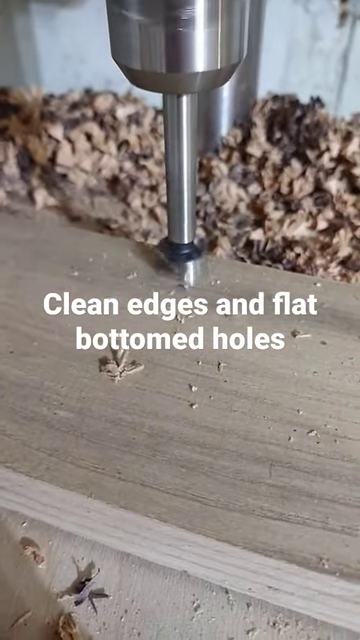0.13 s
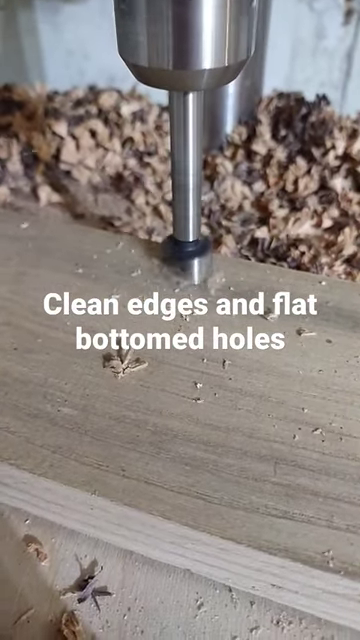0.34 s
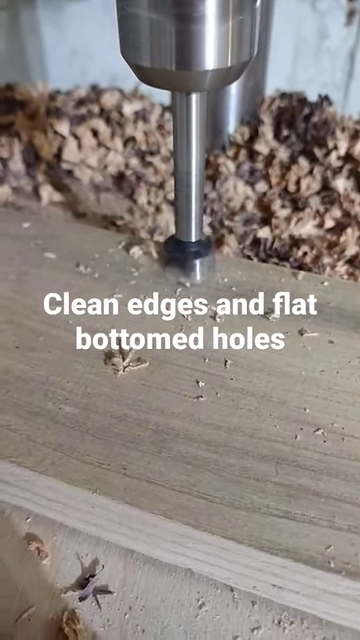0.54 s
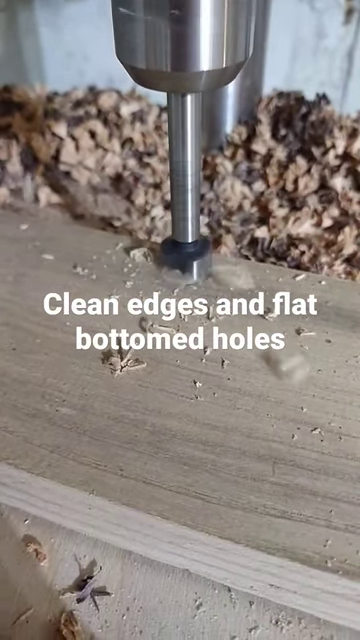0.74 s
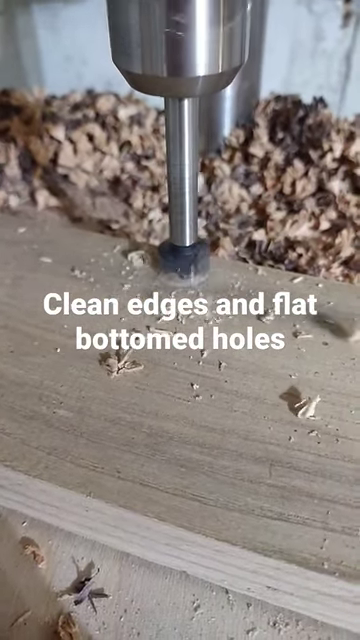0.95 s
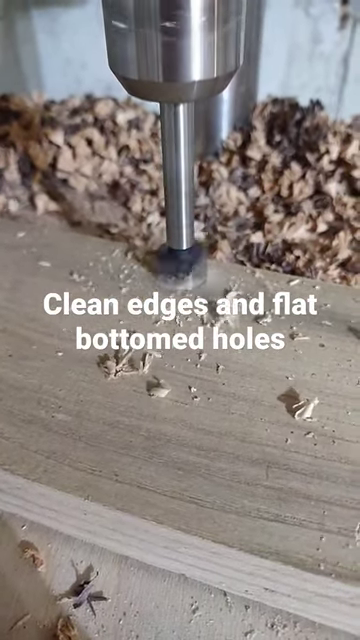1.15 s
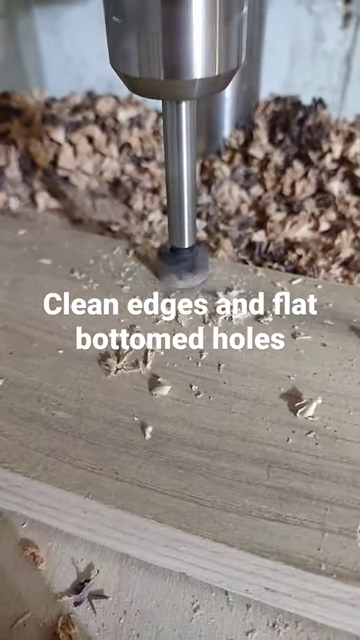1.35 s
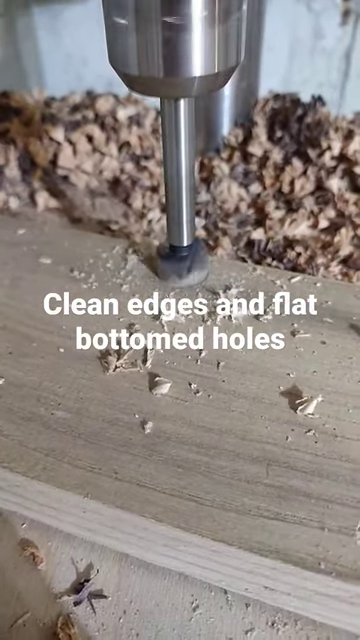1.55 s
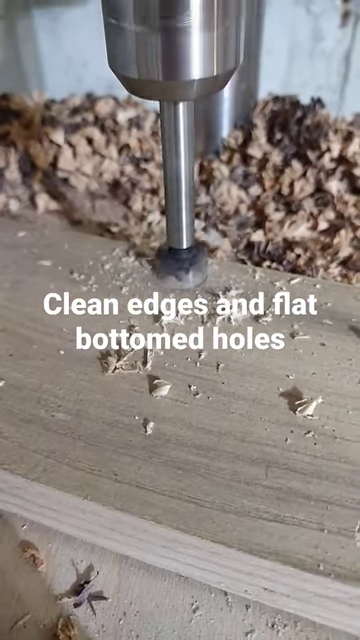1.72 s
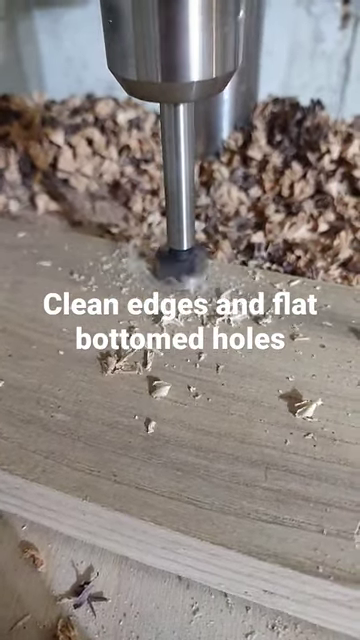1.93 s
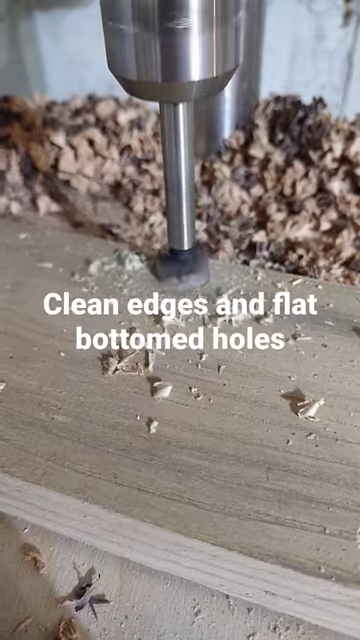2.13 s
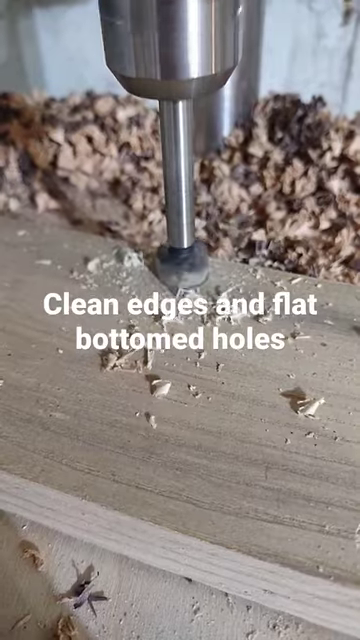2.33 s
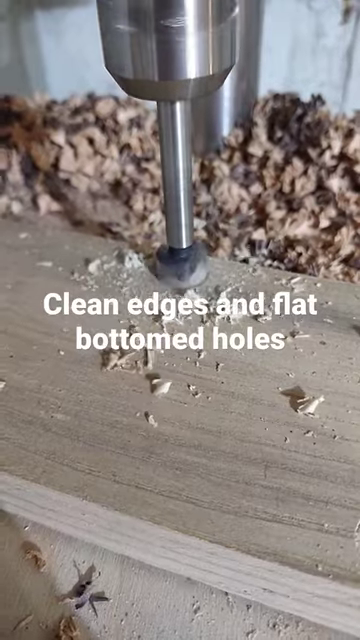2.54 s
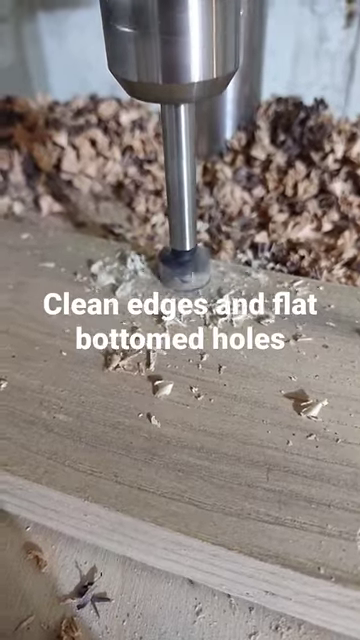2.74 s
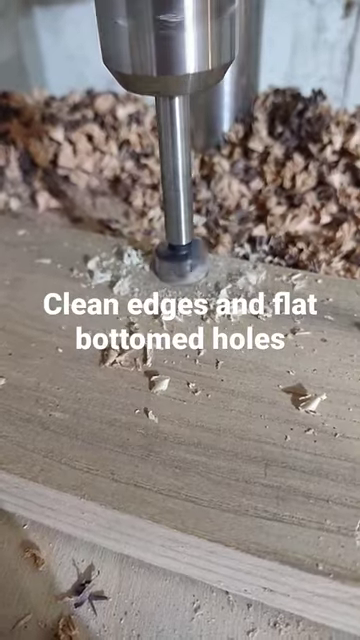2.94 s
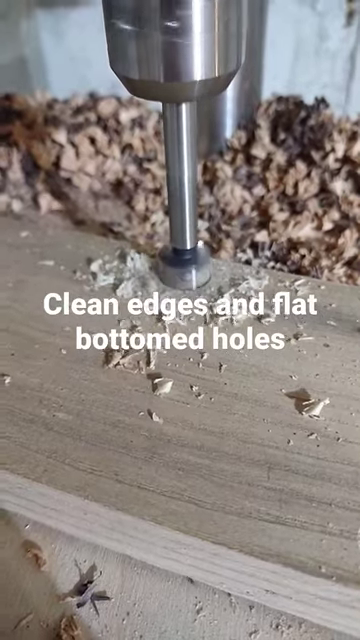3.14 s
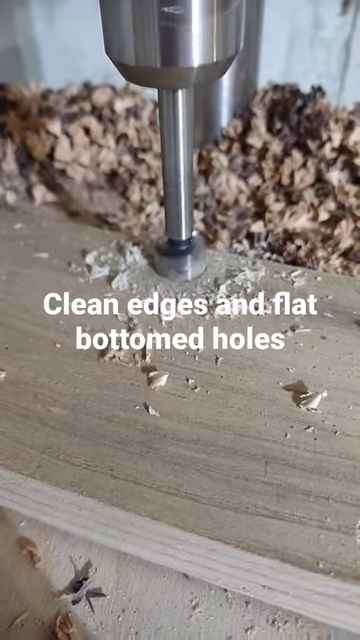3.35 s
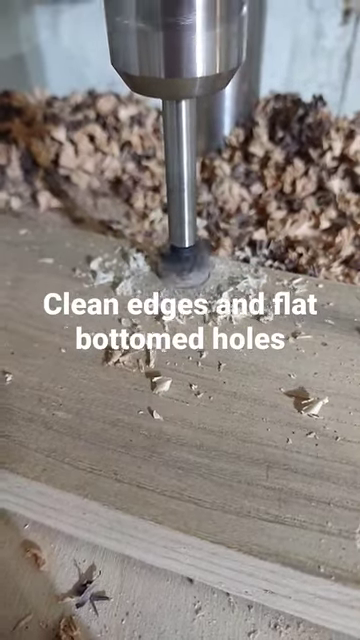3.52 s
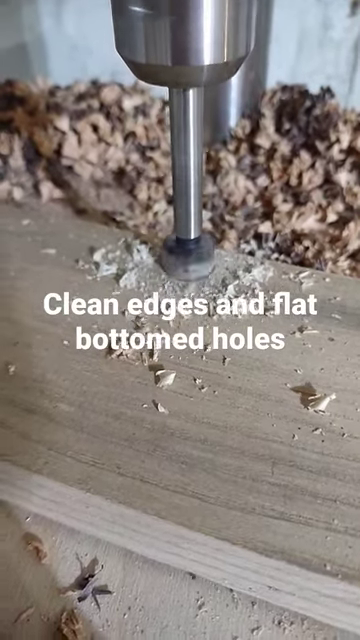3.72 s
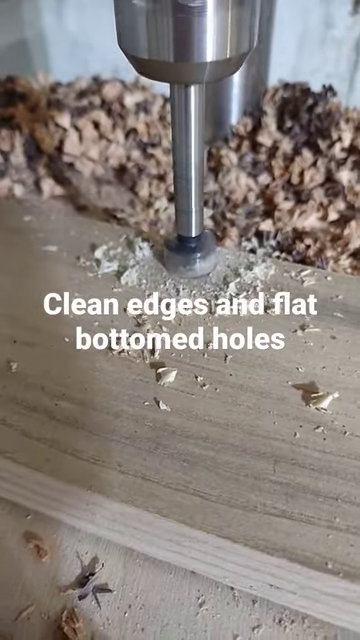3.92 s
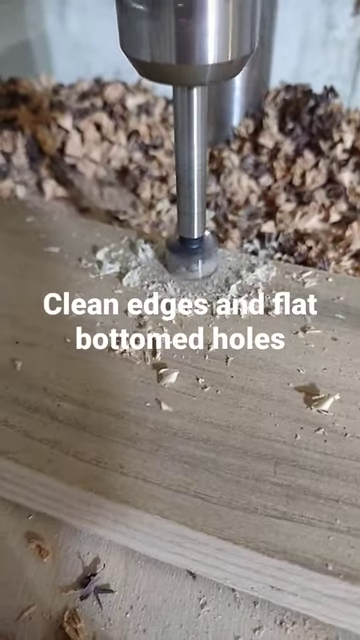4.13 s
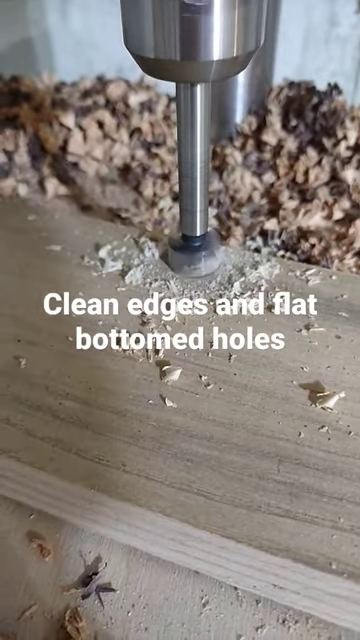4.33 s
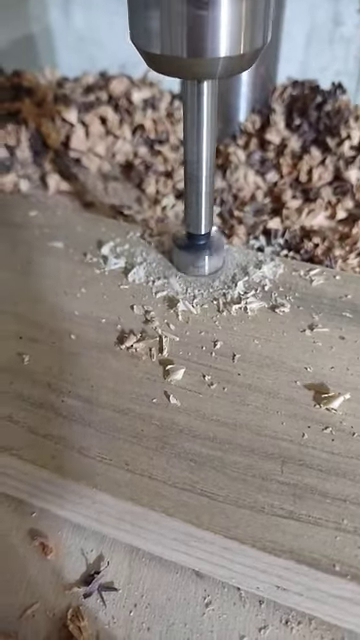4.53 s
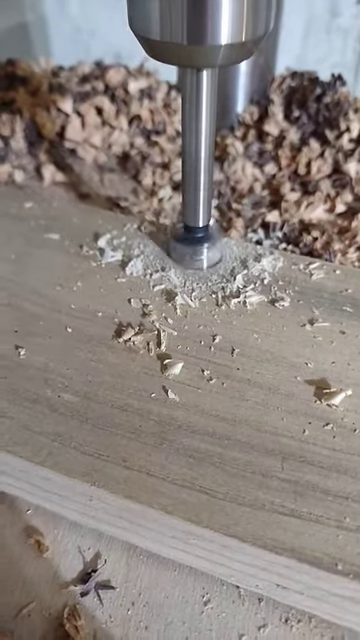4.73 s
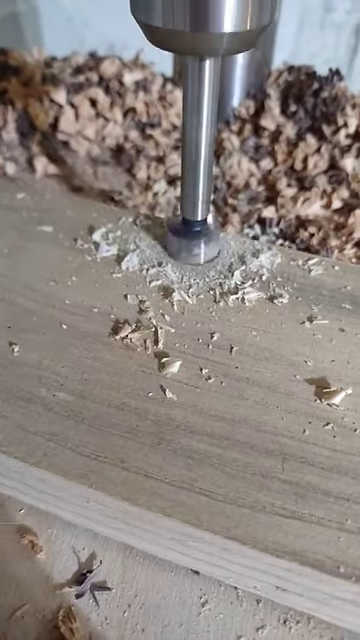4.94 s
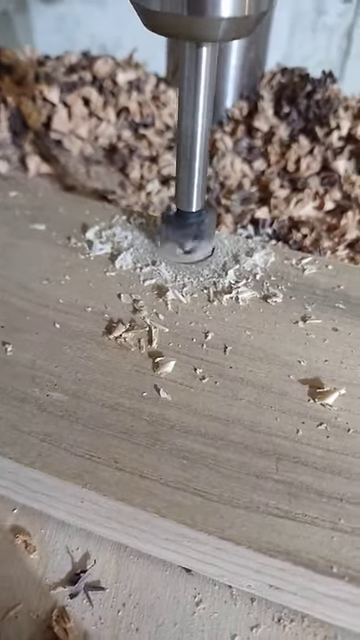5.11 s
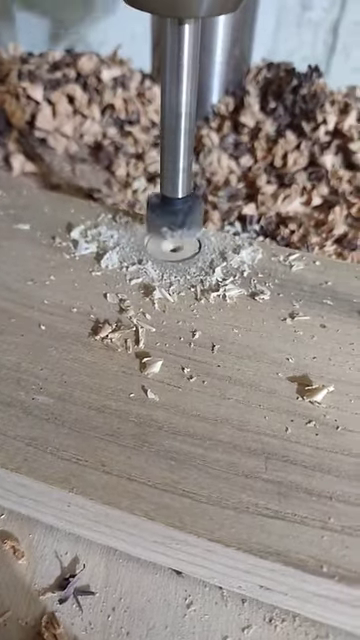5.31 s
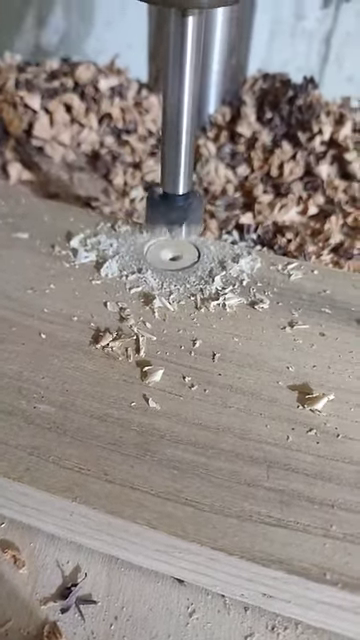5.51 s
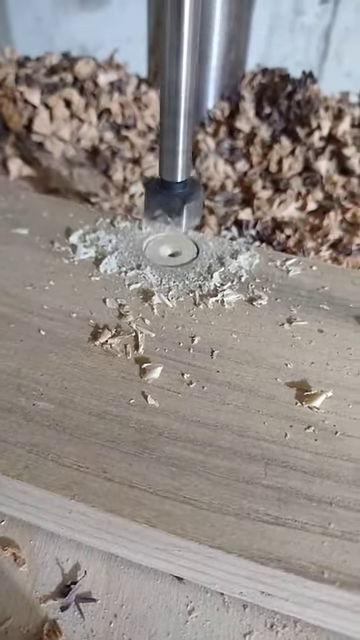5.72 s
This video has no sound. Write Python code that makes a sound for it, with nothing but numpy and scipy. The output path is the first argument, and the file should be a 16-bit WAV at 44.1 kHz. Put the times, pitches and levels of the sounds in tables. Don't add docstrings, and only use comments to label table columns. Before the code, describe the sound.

A drill press cuts a flat-bottomed hole in a board, heard very close in a small, fairly dry workshop. At 0 s the bit is already rubbing the wood; by about 0.4-0.6 s it bites hard into a harsh, loud growl, fluttering roughly 25 times per second. Low table shudder, a woody roar around 400 Hz, a ringing metallic whine near 2 kHz and crackly chip hiss pulse together. At first the grain is ragged; from about 2 s the turns sound increasingly alike, with uneven alternate beats around 2.7 s. The load eases from 4.8 s, the whine sliding slightly downward, and cutting stops by 5.1 s. A quiet, steady motor hum and airy whirr remain. Light ticks come at 5.1-5.2 s, with low, rubbing groans, then a bright tick at 5.54 s, a knock at 5.57 s and the heaviest dull thud at 5.64 s, rebounding quickly.

```python
import sys
import numpy as np
from scipy import signal
from scipy.fft import rfft, irfft, next_fast_len
from scipy.io import wavfile
from scipy.ndimage import uniform_filter1d

SR = 44100
rng = np.random.default_rng(int(sys.argv[2]) if len(sys.argv) > 2 else 0)


def wav_record(signal):
    frames = np.transpose(np.atleast_2d(signal))
    bounded = np.clip(frames, -1, 1)
    quanta = np.round(bounded * 32767).astype(np.int16)
    wavfile.write(sys.argv[1], SR, quanta)


def linear_from_db(decibels):
    return 10 ** (np.asarray(decibels, float) / 20)


N = 254445
TIME = np.arange(N) / SR

# time_s, speed_turns_per_s
SPINDLE = [(0, 12.211), (0.3, 12.187), (0.6, 12.18), (1, 12.189), (1.5, 12.215), (2, 12.246), (2.5, 12.271),
           (3, 12.287), (3.5, 12.294), (4, 12.298), (4.5, 12.31), (5, 12.335), (5.8, 12.335)]
# time_s, level_db
FEED = [(0, -24.5), (.1, -23.5), (.22, -20), (.4, -17.5), (.6, -16.5), (.9, -16), (1.3, -17.5),
        (1.9, -17.5), (2.6, -17.5), (3.2, -17.5), (3.7, -17), (4.3, -17), (4.8, -18), (4.92, -19.5),
        (5.02, -25.5), (5.1, -24.5)]
# full_feed_db, feed_follow_ratio, per_depth_db, mid_hole_db, lift_db
PARTS = dict(table=(-17.5, 1.24, -6.5, 1.5, -3), board=(-21.5, 1.5, 0, 0.36, 3),
         shank=(-19.5, 1.13, 1.5, -2, -6), rim=(-27.5, 1.46, 2.5, 0, 7), chips=(-21.5, 1.5, -3, -4, -6),
         fizz=(-35.5, 1.9, -4, -1.5, -13))
# pitch_hz, width_hz, level_db, polarity
BOARD_MODES = [(220, 16, -19, 0.55), (360.3, 78, -3, -0.52), (397.7, 53.8, -0.5, 1),
               (419.7, 43.5, 2, -0.69), (500, 81, -5, 0.18)]
WALL_MODES = [(586, 35, -1.5, 0.45), (770, 99, -16.5, -0.93), (859, 83, -21.5, 0.69)]
FACE_MODES = [(1078, 66.5, -7, -0.83), (1193, 127, -10, 0.63), (1445, 91, -13.5, -0.85),
              (1597, 80, -18.5, 1)]
SHANK_MODES = [(2162, 85, 0, 1), (2390, 330, -13, -1)]
RIM_MODES = [(1962, 69, -1.7, 1), (3102, 110, -11.5, -0.74), (3880, 270, -18, 0.88)]
CHIP_MODES = [(3100, 124, 1.4, 0.65), (3232, 160, 0.5, -1.06), (3570, 137, -0.5, 1),
              (4029, 132, 0.9, -0.82), (4436, 120, -10.5, 1), (4747, 134, -6, -0.94), (5510, 220, -5, 0.68),
              (5822, 290, -10.5, -1.22), (6150, 720, -20.5, 0.75)]
FIZZ_MODES = [(7000, 90, -3, 1), (7680, 220, 4, 0.9), (8400, 580, -5, -0.81), (8930, 250, 3.5, -1.03),
              (9930, 330, -1, 0.38), (10070, 320, 1.3, 0.8), (10900, 190, 2, -1.1), (11300, 430, -1.5, -1),
              (12200, 400, -16, 1), (12540, 260, 5.5, 1), (12500, 830, -2.5, -1.4),
              (14100, 640, -1.5, -0.89), (15200, 520, -1.5, 1)]
# pitch_hz, width_hz, removed_share
DIPS = [(926, 180, 0.32), (1802, 140, 0.77), (2750, 450, 0), (5100, 270, 0.11), (6550, 250, 0.2),
        (7150, 83, 0), (9600, 250, 0.45), (13900, 400, 0.2)]
# spindle_order, shallow_db, deep_db
SHAKE = [(5, -55, -54), (6, -35, -43), (7, -41, -47), (8, -36, -31), (9, -39, -31), (10, -32, -36),
         (11, -32, -41), (12, -26, -30), (13, -31, -40), (14, -20, -29.5), (15, -38, -48), (16, -33, -38),
         (17, -41, -45), (18, -52, -50)]
OPPOSED_ORDERS = (5, 6, 7, 8, 10, 15, 16, 17, 18)
MIDWAY_DB = {7: 5, 9: 7}
# start_s, level_db, brightness_0_1, rattle_s
KNOCKS = [
    (5.102, -39, 0.9, 0.004),
    (5.172, -26, .3, .004),
    (5.54, -20.5, 1, 0.01),
    (5.387, -52, 0.9, .02),
    (5.571, -40, .99, .002),
    (5.575, -16.5, 0.44, 0.0037),
    (5.643, -10.5, 0.03, 0.0054),
    (5.648, -15.5, 0, 0.013),
    (5.663, -20, 0.3, 0.01),
    (5.675, -24, 0, 0.014),
]
# pitch_hz, width_hz, level_db, polarity
HEAD_MODES = [(379, 34, 8, 0.92), (453, 114, 4, -0.82), (622, 41, 0.5, 1), (790, 290, -19, 0.13),
              (1146, 92, -4, -1.17), (1410, 270, -7, 0.98), (1860, 120, -12, -1.23), (2450, 210, -18, 0.76),
              (3250, 730, -30.5, -1.44), (2780, 400, -29, 0.58), (4860, 680, -30, 0.45)]
NUT_MODES = [(1210, 380, 1, 0.97), (1960, 220, 6.5, -1), (2570, 400, -0.5, 1), (4540, 3300, -11.5, -0.81),
             (9000, 2800, -14, 1), (14000, 3000, -17, -0.87)]
# centre_s, level_db, pitch_hz,
# length_s
GROANS = [(5.165, -27, 350, 0.047), (5.36, -29, 156, 0.094), (5.463, -38, 190, 0.22),
          (5.68, -28, 183, 0.091), (5.765, -29, 450, 0.084), (4.5, -36, 305, 0.15), (5.43, -67, 14200, .2),
          (5.522, -56, 14000, .008), (5.577, -50, 15200, .008), (5.2, -66.5, 4560, .9),
          (5.6, -64, 4100, .8), (1.17, -22, 432, 0.76)]
# pitch_hz, density_db_per_hz
IDLE = [(70, -10.5), (170, 2), (280, -8), (400, 1), (600, -9.5), (2600, -23), (4000, -43.5), (15500, -54)]
# pitch_hz, level_db
HUM = [(120, -33.5), (240, -35.5), (393, -40.5), (630, -42.5), (981, -49), (1012, -49.5), (1145, -48),
       (1389, -54), (1685, -54), (1970, -51), (2080, -65), (2440, -55)]

SHALLOW, DEEP = 0.2, 0.78
FULL_FEED_DB = -17
BOTTOM_S, LIFT_S = 4.82, 0.24
POINT_S = 0.3
SHARP, SCORE_SHARP, SCORE_S, SCORE_WIDTH_S = 0.62, 1.05, 0.52, 0.5
LEAD, KNOT_LEAD, KNOT_S, KNOT_WIDTH_S = 0.12, 0.52, 2.7, 0.91
REPEAT, GUIDED_REPEAT, GUIDE_S, GUIDE_RISE_S = 0.08, 0.85, 0.51, 1.66
SLACK_HZ = 176.6


def cut():
    angle = turns()
    sharp, lead, repeat = manner()
    slack_hz = SLACK_HZ * lift()

    grain = fibres(angle, repeat, 4.4, 0.0025)
    board = ring(grain * bite(angle, 0.12 * sharp, 0.14 * lead, 0.016), BOARD_MODES)
    board += ring(grain * linear_from_db(5.1 * (repeat - 0.56)), WALL_MODES)
    board += ring(grain * bite(angle, 0.68 * sharp, 0.3 * lead, 0.538), FACE_MODES)

    shank = fibres(angle, 1.02 * repeat, 1.17, 0.0025) * bite(angle, 0.37 * sharp, 0.42 * lead, 0.572)
    shank = ring(shank, SHANK_MODES)
    shank = ring(shank, [(1940, 1200, 0, 1)])

    rim = fibres(angle, 0.79 * repeat, 3.2, 0.002) * bite(angle, 0.72 * sharp, 0.5 * lead, 0.5)
    rim = ring(rim, RIM_MODES)

    chips = fibres(angle, 0.5 * repeat, 3.5, 0.0015) * bite(angle, 0.5 * sharp, 0.15 * lead, 0.045, skew=0.55)
    chips = ring(chips, CHIP_MODES)

    fizz = sum(tearing(angle, sharp, lead, repeat, modes) for modes in (FIZZ_MODES[:7], FIZZ_MODES[7:]))

    catch = fibres(angle, repeat, 6.0, 0.0019) * bite(angle, 0.5 * sharp, 9 * lead + 3.8 * depth(), 0.534)
    catch = ring(catch, FACE_MODES[2:] + [(2200, 120, -7.5, -0.95), (3640, 130, -18.0, 0.71)])

    layers = [
        (board, level("board")),
        (lowered(shank, slack_hz), level("shank")),
        (rim, level("rim")),
        (catch, level("board") - 23.0 + 14 * repeat),
        (lowered(chips, 1.4 * slack_hz), level("chips")),
        (fizz, level("fizz")),
    ]
    mix = sum(evened(sound) * linear_from_db(level_db) for sound, level_db in layers)
    return clamped(mix) * contact()


def fibres(angle, repeat, spread_db, slip_turns):
    size, count = 3600, int(angle[-1]) + 3
    snaps = rng.standard_normal((count, size))
    snaps = snaps * linear_from_db(spread_db * np.minimum(rng.exponential(1, (count, size)), 5))
    keep = np.clip(np.interp(np.arange(count), angle, repeat), 0, 0.98)
    for k in range(1, count):
        snaps[k] = keep[k] * snaps[k - 1] + np.sqrt(1 - keep[k] ** 2) * snaps[k]
    place = np.round((angle + 1 + slip_turns * drift(6)) * size).astype(int)
    return snaps.ravel()[place]


def bite(angle, sharp, lead, at_turns, skew=1.0):
    phase = 2 * np.pi * (angle - at_turns)
    both_lips = sharp * np.cos(2 * phase - skew * np.cos(2 * phase))
    swell = np.exp(both_lips + lead * np.cos(phase))
    return swell / np.sqrt(uniform_filter1d(swell ** 2, size=3600))


def tearing(angle, sharp, lead, repeat, modes):
    tears = evened(fibres(angle, 0.4 * repeat, 6.2, 0.0015)) * linear_from_db(2.2 * drift(20))
    tears = tears * bite(angle, 1.08 * sharp, 0.18 * lead, 0.04, skew=0.47)
    return ring(0.62 * rng.standard_normal(N) + tears, modes)


def turns():
    return np.cumsum(curves(SPINDLE)[0]) / SR - 0.0127


def manner():
    sharp = SHARP * np.clip(TIME / POINT_S, 0.2, 1)
    sharp += SCORE_SHARP * np.exp(-(np.log(TIME / SCORE_S + 1e-3) / SCORE_WIDTH_S) ** 2)
    lead = LEAD + KNOT_LEAD * np.exp(-((TIME - KNOT_S) / KNOT_WIDTH_S) ** 2)
    guided = np.clip((TIME - GUIDE_S) / GUIDE_RISE_S, 0, 1)
    return sharp, lead, REPEAT + (GUIDED_REPEAT - REPEAT) * guided


def depth():
    return np.clip(TIME / BOTTOM_S, 0, 1)


def lift():
    return np.clip((TIME - BOTTOM_S) / LIFT_S, 0, 1)


def contact():
    return np.clip((5.1 - TIME) / 0.041, 0, 1)


def level(part):
    full_db, follow, deep_db, mid_db, lift_db = PARTS[part]
    feed_db = curves(FEED)[0] - FULL_FEED_DB
    hole_db = deep_db * depth() + mid_db * np.sin(np.pi * depth())
    return full_db + follow * feed_db + hole_db + lift_db * lift() ** 2


def clamped(x):
    for hz, width_hz, share in DIPS:
        x = x - np.clip(share, 0, 1) * ring(x, [(hz, width_hz, 0, 1)])
    return x


def lowered(x, hz):
    analytic = signal.hilbert(x, next_fast_len(N))[:N]
    return (analytic * np.exp(-2j * np.pi * np.cumsum(hz) / SR)).real


def shake(angle, level_db):
    out = np.zeros(N)
    midway = np.sin(np.pi * np.clip((depth() - SHALLOW) / (DEEP - SHALLOW), 0, 1))
    for order, *ends_db in SHAKE:
        lag_turns = 0.625 * order + 0.25 + 0.5 * (order in OPPOSED_ORDERS)
        order_db = np.interp(depth(), [SHALLOW, DEEP], ends_db)
        order_db = order_db + midway * MIDWAY_DB.get(order, 0) + 0.9 * drift(0.98)
        out += linear_from_db(order_db) * np.cos(2 * np.pi * (order * angle + lag_turns))
    out /= np.sqrt(uniform_filter1d(out ** 2, size=14400))
    rumble = ring(rng.standard_normal(N), [(82, 48, 0, 0.97), (115, 42, -4.0, -1.4), (165, 36, -7.0, 0.11)])
    return linear_from_db(level_db) * (out + linear_from_db(-16) * evened(rumble))


def knocks():
    dull, bright = np.zeros((2, N))
    rattle = evened(rng.standard_normal(N) * linear_from_db(1.7 * rng.exponential(1, N)))
    for start_s, level_db, brightness, rattle_s in KNOCKS:
        decay = (TIME >= start_s) * np.exp(-np.maximum(TIME - start_s, 0) / rattle_s)
        blow = decay * rattle * linear_from_db(level_db)
        share = np.clip(brightness, 0, 1)
        dull += (1 - share) * blow
        bright += share * blow
    return linear_from_db(17.5) * ring(dull, HEAD_MODES) + linear_from_db(1) * ring(bright, NUT_MODES)


def groans():
    out = np.zeros(N)
    for centre_s, level_db, hz, length_s in GROANS:
        first = max(int((centre_s - 2 * length_s) * SR), 0)
        at = slice(first, int((centre_s + 2 * length_s) * SR))
        mode = [(hz, 0.11 * hz, 0, 1)]
        rub = evened(ring(ring(rng.standard_normal(N)[at], mode), mode))
        out[at] += linear_from_db(level_db) * rub * np.exp(-((TIME[at] - centre_s) / (0.5 * length_s)) ** 2)
    return out


def motor():
    frames, bins_hz = N // 256 + 5, np.fft.rfftfreq(1024, 1 / SR)
    a, b, patches = rng.standard_normal((frames, 513, 3)).T
    patches = uniform_filter1d(patches, size=4, axis=0)
    patches = evened(uniform_filter1d(patches, size=10, axis=1))
    hz, db = np.transpose(IDLE)
    whirr_db = np.interp(np.log(bins_hz + 1), np.log(hz + 1), db)[:, None] + 1.7 * patches
    whirr = signal.istft((a + 1j * b) * linear_from_db(whirr_db), nperseg=1024, noverlap=768)[1][:N]
    lines = np.zeros(N)
    for line_hz, line_db in HUM:
        lines += linear_from_db(line_db + 1.1 * drift(5.5)) * np.sin(2 * np.pi * (line_hz * TIME + rng.random()))
    return evened(whirr) * linear_from_db(-30) + np.sqrt(2) * lines


def shop(x):
    t = np.arange(SR // 3) / SR
    sparse = rng.choice([-1., 1.], len(t)) * (rng.random(len(t)) < 0.05)
    taps = sparse * linear_from_db(-60 * t / 0.41) * (t > 0.004)
    return signal.fftconvolve(x, taps / np.linalg.norm(taps))[:N]


def ring(force, modes):
    size = next_fast_len(len(force) + 8192)
    f = np.fft.rfftfreq(size, 1 / SR)
    body = 0
    for hz, width_hz, db, sign in modes:
        damping = 1j * f * width_hz
        body = body + sign * linear_from_db(db) * damping / (hz ** 2 - f ** 2 + damping)
    return irfft(rfft(force, size) * body, size)[:len(force)]


def drift(hz):
    return evened(signal.lfilter(*signal.butter(2, hz, fs=SR), rng.standard_normal(N)))


def evened(x):
    return x / np.sqrt(np.mean(x ** 2) + 1e-20)


def curves(rows):
    s, *columns = np.transpose(rows)
    return [np.interp(TIME, s, c) for c in columns]


def scene():
    near = cut() + knocks() + groans()
    table = shake(turns(), level("table")) * contact()
    return (near + linear_from_db(-12.5) * shop(near) + table + motor())[None]


def roll_off(x):
    return signal.sosfilt(signal.butter(12, 15810, fs=SR, output="sos"), x)


def record(dry):
    thin = signal.lfilter(*signal.butter(2, 60, "high", fs=SR), dry)
    full = 1.299 * np.tanh(thin / 1.308)
    limited = signal.oaconvolve(full, signal.firwin(401, 15490, fs=SR)[None], "same")
    return roll_off(limited)


dry = scene()
out = record(dry)
wav_record(out)
```